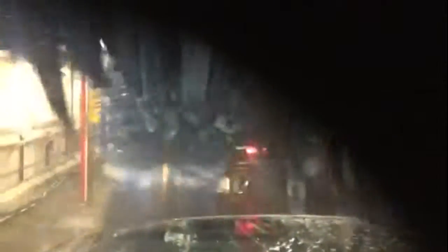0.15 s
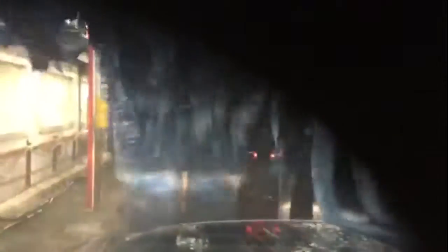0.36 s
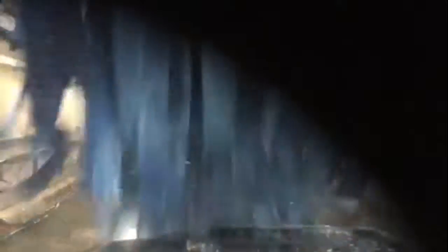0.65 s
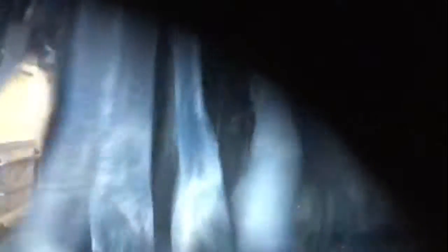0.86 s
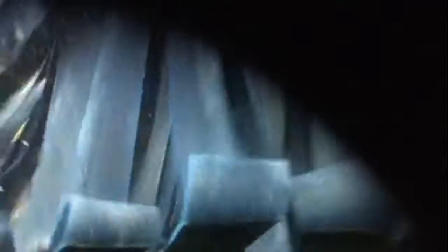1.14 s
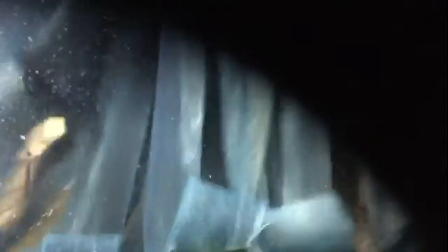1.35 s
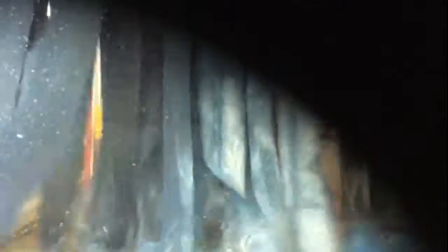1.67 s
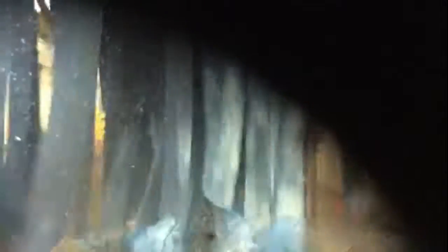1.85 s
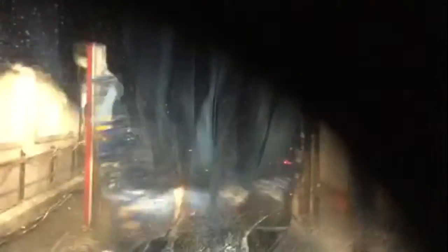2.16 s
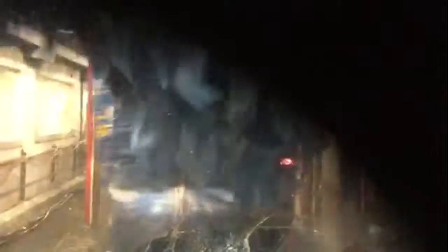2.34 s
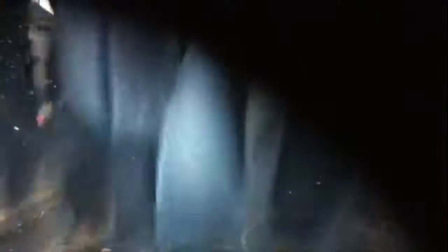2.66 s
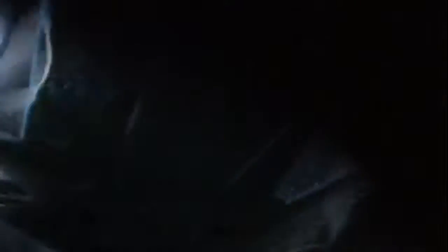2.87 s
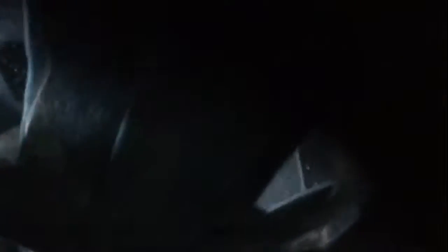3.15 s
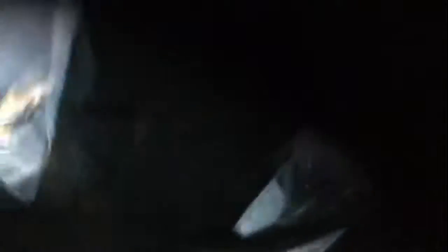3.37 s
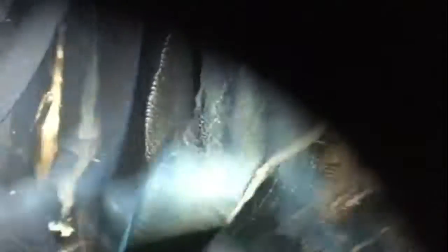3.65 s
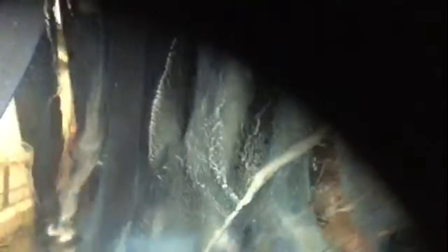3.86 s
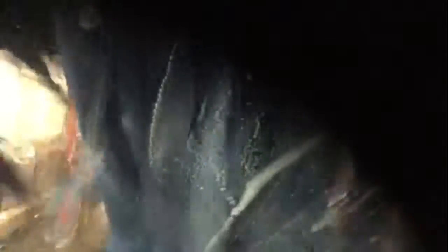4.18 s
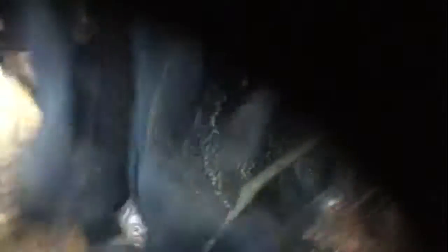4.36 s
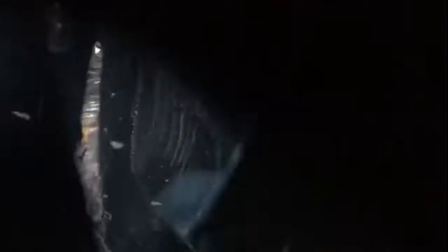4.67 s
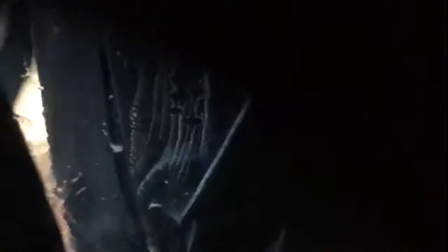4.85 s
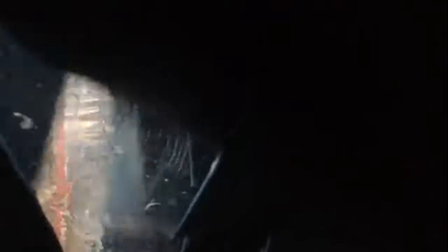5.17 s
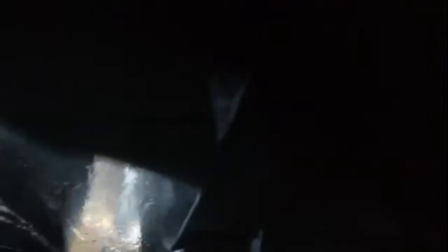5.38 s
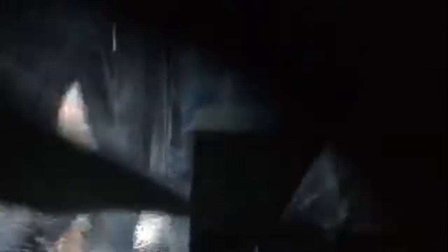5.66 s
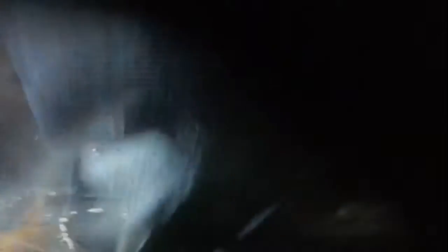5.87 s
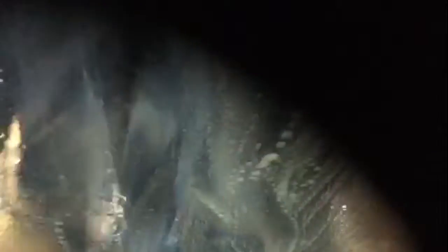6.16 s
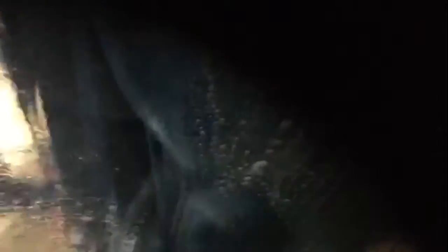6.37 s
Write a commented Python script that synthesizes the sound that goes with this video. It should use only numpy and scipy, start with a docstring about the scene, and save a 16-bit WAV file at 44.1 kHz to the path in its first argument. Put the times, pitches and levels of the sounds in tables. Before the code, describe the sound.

Heard from inside a closed car in an automatic wash: dense wet cloth drumming booms through the panels over a steady low motor drone and faint water hiss. Rapid soft slaps brush the glass with tiny squeaks, then harder whip-like cracks and heavy thuds arrive in bursts near the middle and later. One phone-like microphone in the cabin; dull, bass-heavy and close.

```python
"""Wet cloth drumming on the body panels over the drone of machinery, inside a car in an automatic wash.
Water sprays on the glass, and cloth slaps, squeaks, pops and cracks against it; heavy thuds ring the panels.
Noise shaped by tone colour makes the drone, spray, scrubbing and slaps; ringing resonances make the
drumming, thuds, squeaks, pops and cracks. The closed cabin makes it all dull and boomy.
"""
import sys
import numpy as np
from scipy import signal
from scipy.fft import rfft, irfft
from scipy.io import wavfile
from scipy.ndimage import uniform_filter1d

SR = 44100
rng = np.random.default_rng(int(sys.argv[2]) if len(sys.argv) > 2 else 0)


def generate_wav(signal):
    """Clip the signal to [-1, 1] and save it as 16-bit WAV at the path in sys.argv[1]."""
    frames = np.transpose(np.atleast_2d(signal))
    scaled = np.clip(frames, -1, 1) * 32767
    pcm = np.round(scaled).astype(np.int16)
    wavfile.write(sys.argv[1], SR, pcm)


N = 287532

# how hard the wash works over time; spray gets 3 dB more in spray():
# time_s, panel_drumming_db, cabin_boom_db, roar_db, spray_db, spray_treble_lift_db
WASH_STRENGTH = [(0.0, -29.5, -21.5, -36, -51.5, 4), (0.35, -26.5, -27.5, -40.5, -52, 1),
                 (0.7, -25.5, -22.5, -45, -54, 2.5), (1.05, -28, -30, -41.5, -53, 3.5),
                 (1.45, -24.5, -28.5, -39.5, -55.5, 2), (1.7, -25.5, -27, -40.5, -50.5, -9),
                 (1.9, -25, -31, -42.5, -57.5, 1), (2.05, -25.5, -30, -38.5, -58.5, 2),
                 (2.2, -25.5, -34, -37, -54.5, 9), (2.35, -30, -34.5, -34, -58, 5),
                 (2.45, -30.5, -26.5, -41.5, -55, -1), (2.6, -30.5, -26.5, -43, -53, -1.5),
                 (2.8, -26, -31.5, -42.5, -56, 1), (3.15, -32.5, -28.5, -42.5, -55, 0),
                 (3.4, -27, -25.5, -42, -54, -4), (3.55, -32.5, -31.5, -44, -55.5, -7.5),
                 (3.85, -30, -29.5, -40.5, -57.5, 6.5), (4.15, -28, -37.5, -42, -56.5, 0.5),
                 (4.4, -31.5, -29, -41, -56.5, 4.5), (4.68, -24.5, -31.5, -40.5, -56, 6),
                 (4.9, -29, -32.5, -49, -54, -4), (5.1, -29, -27.5, -39.5, -53.5, 1),
                 (5.3, -30.5, -28.5, -41.5, -50, 3.5), (5.6, -30.5, -34, -38, -51.5, -5),
                 (5.85, -28.5, -35, -42, -50.5, -2), (6.15, -29.5, -32, -42, -52, 0),
                 (6.52, -28.5, -34, -43, -56, 2)]
# where the cloth lands: time_s, small_stiff_panels_over_large_ones_db
PANEL_BALANCE = [(0, 0.5), (.8, -3.5), (1.3, 3.5), (1.9, -1), (2.1, 3.5), (2.35, 8), (2.55, -1),
                 (3.4, -1.5), (4.1, -2.5), (4.6, -1.5), (5.1, 1.5), (5.7, 1.5), (6.1, -2), (6.52, -4)]
# resonances of the panels and cabin air: pitch_hz, relative_level_db, time_to_fall_60_db_s
PANEL_RINGS = [(52.7, -6, 0.18), (75, -2, 0.084), (101.7, -1, 0.15), (129, -2, 0.083), (162.6, -2.5, 0.15),
               (207, -2, 0.079), (253, -5, 0.08), (294.5, -6, 0.095), (352.5, -9, 0.081),
               (491.5, -16.5, 0.051), (630, -18, 0.047)]
# tone colour of the machinery: frequency_hz, relative_level_db
DRONE_COLOUR = [(150, -28.5), (250, -12.5), (298, 2), (375, -11.5), (398, -6.5), (525, -16.5), (563, -19.5),
                (620, -12.5), (665, -14.5), (770, -15), (983, -27.5), (1460, -31), (4000, -55), (5200, -76),
                (8800, -120)]
# pump tone: pitch_hz, average_level_db
PUMP_TONES = [(619, -61.5)]
# tone colour of water on the glass: frequency_hz, relative_level_db
SPRAY_COLOUR = [(710, -7), (1200, -0.5), (1310, -2.5), (1420, -5.5), (1720, -10.5), (2000, -12.5),
                (2400, -18), (2800, -20), (3200, -22.5), (4300, -27.5), (5000, -29), (5500, -32.5),
                (5990, -36.5), (13700, -47), (15000, -58.5)]
# tone colour of slaps heard through the glass: frequency_hz, relative_level_db
GLASS_COLOUR = [(290, -23), (500, -3), (835, -12.5), (1080, -11), (1400, -14), (1720, -18.5), (2050, -19),
                (2330, -16), (3140, -20.5), (3570, -21.5), (4300, -26.5), (5050, -26), (5800, -30.5),
                (7800, -39), (12500, -45), (15000, -53.5)]
# wet slaps on the glass; slaps() lowers every level by 11.5 dB:
# hit_s, level_db, treble_tilt_db_per_octave
GLASS_SLAPS = [(0.0233, -39, -3), (0.0852, -38.5, -1.5), (0.1555, -41, -1), (0.2174, -38.5, -2),
               (0.2997, -37, -1.5), (0.315, -42, -3), (0.3346, -40.5, -5), (0.3541, -37, 0.5),
               (0.4424, -39.5, -4), (0.5707, -49.5, 0), (0.6205, -53, 1), (0.6424, -38.5, -2),
               (0.6883, -43, -3), (0.7811, -39, -3), (0.839, -40, -1), (0.9219, -41.5, -2.5),
               (0.9687, -40.5, -2.5), (1.024, -36, -3.5), (1.0731, -48, -2), (1.1334, -42, -5),
               (1.1707, -45, -6), (1.3254, -39, -2.5), (1.4187, -38, -4.5), (1.4492, -39, 0),
               (1.465, -38, -2.5), (1.5334, -39.5, -3.5), (1.5953, -40, -3.5), (1.6202, -42.5, -1),
               (1.6796, -39, -1.5), (1.755, -40.5, -3), (1.8094, -44.5, 1.5), (1.84, -38.5, -3),
               (1.8871, -43, 0), (1.9031, -31.5, -1), (1.9734, -41.5, -2), (2.0014, -36, -1.5),
               (2.0328, -41, -2), (2.0502, -39.5, -1.5), (2.1186, -38, -2), (2.168, -36.5, -2.5),
               (2.2494, -48, 1), (2.2887, -38, 1.5), (2.3256, -33, 0), (2.3965, -46, -2),
               (2.4189, -36.5, -1), (2.4788, -47, 1), (2.7128, -51, 3.5), (2.804, -30.5, -1),
               (2.8579, -43.5, 0), (2.8814, -48, 0), (2.899, -40.5, -3), (3.045, -48, -1.5),
               (3.2191, -45, -6.5), (3.25, -46, -1.5), (3.3418, -45.5, -0.5), (3.4, -38.5, 0),
               (3.447, -38.5, 2.5), (3.457, -38.5, 0), (3.486, -50, -2), (3.858, -43.5, -3.5),
               (4.1899, -48, -4), (4.5486, -42.5, -4), (4.617, -34, -2.5), (4.652, -36, 0.5),
               (4.695, -40, -0.5), (4.738, -36, -1), (4.7674, -44, -2), (4.785, -36, -0.5),
               (5.1592, -34, -1.5), (5.185, -44, 2), (5.204, -43, 2), (5.221, -44, 1), (5.24, -44, 1),
               (5.277, -34.5, 0.5), (5.298, -53, 3), (5.3253, -35.5, 2.5), (5.3916, -41.5, -1),
               (5.445, -43.5, -1.5), (5.505, -50, 2), (5.62, -46.5, -1), (5.65, -41, -4), (5.69, -56, 5),
               (5.76, -46.5, 2), (5.81, -42, -5), (5.84, -60, 7), (5.8887, -44, 3), (5.912, -34.5, 0.5),
               (5.9705, -42, 0), (6.0516, -40.5, -0.5), (6.1105, -43, 0.5), (6.225, -48, -4),
               (6.2682, -42, -1.5), (6.336, -37, -2)]
# squeaks of wet cloth dragging on the glass; level is lowered by 5 dB in squeaks_and_pops():
# loudest_s, pitch_hz, level_db, half_of_full_length_s
CLOTH_SQUEAKS = [(0.028, 2900, -56, 0.029), (0.197, 2830, -56, 0.06), (0.414, 2750, -61, 0.033),
                 (0.569, 2730, -55, 0.034), (0.697, 2830, -52.5, .04), (2.184, 2390, -48.5, 0.053),
                 (2.29, 2410, -49, 0.039), (2.485, 2590, -54, 0.038), (5.425, 4180, -66, 0.067),
                 (5.48, 2780, -66, 0.06), (5.777, 4180, -64, 0.064)]
# strip ends popping on the glass, lowered by the same 5 dB:
# loudest_s, pitch_hz, level_db, half_of_full_length_s
STRIP_POPS = [(1.032, 2570, -43.5, 0.0071), (2.124, 2670, -45, 0.0071), (2.281, 593, -30, 0.0073),
              (2.776, 5000, -59, .005), (2.807, 2500, -38, .005), (2.811, 1030, -41, 0.006),
              (2.824, 5080, -55, 0.0065), (3.397, 5200, -51, 0.0042), (3.457, 5280, -44.5, 0.0069),
              (3.459, 1380, -29, 0.0073), (3.468, 606, -34.5, 0.0082), (3.486, 4500, -54, 0.0033),
              (4.62, 4870, -46.5, 0.0073), (4.784, 3280, -39.5, 0.012), (5.157, 5240, -49, 0.0059),
              (5.27, 960, -38, 0.0057), (5.27, 4970, -37.5, 0.004), (5.795, 13000, -67, .004)]
# heavy blows of cloth on the panels: start_s, peak_db, strongest_panel_pitch_hz
HEAVY_BLOWS = [(0.05, -15.5, 73.5), (0.073, -16, 88), (0.202, -15, 105), (0.324, -8, 94),
               (0.525, -11.5, 86), (0.56, -15.5, 125), (0.62, -16, 131), (0.799, -9, 153),
               (0.835, -8.5, 155), (0.883, -12, 98), (0.967, -19, 113), (1.008, -12, 100), (1.021, -19, 86),
               (1.078, -19, 150), (1.175, -20, 105), (1.406, -17, 99), (1.44, -7, 108), (1.624, -12.5, 118),
               (2.038, -13.5, 96), (1.7, -17.5, 265), (1.762, -13.5, 217), (1.915, -28, 370),
               (2.194, -24, 235), (2.632, -10, 79), (2.665, -16, 107), (2.722, -17.5, 94),
               (2.8, -12.5, 300), (2.836, -16, 240), (2.801, -6, 144), (2.834, -11, 105),
               (3.138, -14.5, 84), (3.365, -14, 81.5), (3.414, -13.5, 107), (3.453, -13, 79.5),
               (3.466, -8, 100), (3.64, -14, 75.5), (4.138, -15, 103), (4.549, -9.5, 253),
               (4.573, -15, 188), (4.611, -19.5, 485), (4.615, -12.5, 242), (4.643, -7, 253),
               (4.698, -13, 228), (4.715, -13.5, 300), (4.731, -6, 270), (4.734, -28, 480),
               (4.737, -7.5, 121), (4.623, -15, 250), (4.773, -13, 260), (4.751, -24, 131),
               (4.858, -14, 123), (5.114, -23, 89.5), (5.163, -19, 300), (5.229, -16, 201),
               (5.267, -19, 250), (5.289, -18, 95), (5.563, -16.5, 79.5), (5.798, -16.5, 93),
               (6.115, -19, 152)]
# sharp, toneless cracks: start_s, centre_hz, peak_db, width_as_share_of_centre
STRIP_CRACKS = [(1.029, 1200, -25, .9), (1.03, 4500, -41, 1.2), (1.903, 3000, -38, 1.5),
                (2.272, 800, -30, .8), (2.795, 1300, -24, .8), (2.803, 2200, -23, 1.6),
                (2.808, 2500, -29, 1.5), (2.822, 3500, -38, 1.5), (2.86, 1210, -26, 1.1),
                (2.882, 1500, -28, 0.7), (2.898, 3500, -32, 0.95), (2.903, 1200, -32, .9),
                (3.123, 1820, -28, .8), (3.397, 4530, -32, 1.4), (3.403, 3500, -30, 1.5),
                (3.445, 3700, -33, .5), (4.55, 1500, -24, 1.3), (4.556, 2000, -32, 1.5),
                (4.611, 1300, -18.5, 1.4), (4.619, 4500, -36, 0.95), (4.643, 1100, -23, 1.4),
                (4.653, 4000, -36, 0.89), (4.732, 3500, -33, 1.1), (4.735, 1000, -20.5, 1.1),
                (4.783, 3500, -30, .9), (5.16, 1610, -22.5, .8), (5.161, 5500, -34, 1.3),
                (5.269, 2200, -23, 1.7), (5.27, 5000, -34, .7), (5.759, 1500, -35, 1.1),
                (6.049, 1500, -29, 1)]

# spots at or above STIFF_HZ are small and stiff; cloth lying on a panel leaves this share of its ring time
STIFF_HZ, LARGE_RING_SHARE, STIFF_RING_SHARE = 185.0, 0.77, 0.41
WHIRR_DB, WHIRR_WANDER_DB, WANDER_PER_S = -51, 1.5, 4.6
BRIGHT_HZ = 3600  # the spray's treble starts here
# cloth scrubbing along the wet bonnet until the strips lift off it
SCRUB_DB, SCRUB_HZ, SCRUB_WIDTH_HZ, LIFTS_S, LIFT_FADE_S = -60.5, 2570, 1200, 2.7, 0.1
SLAP_FADE_S = 0.1  # time to fall 60 dB at slap level -37.5 dB
HARD_SHORTEN = 0.19  # dB of fade time lost per dB of extra slap level
KNOCK_DB, KNOCK_SCATTER_DB = 0.5, 1  # low knock in each slap
SPATTER_DB, SPATTER_S = 2.5, .003  # unevenness of the water spurts and time between their levels
# light slaps: level over the spray column (before the slap trim), its scatter, tilt per octave
LIGHT_OVER_DB, LIGHT_SCATTER_DB, LIGHT_TILT_DB = 5.5, 0.5, -4
SQUEAK_WIDTH_HZ, POP_WIDTH_SHARE = 190, 0.11  # a pop's width is a share of its pitch
CRACK_S, CRACK_GRIT = 0.0018, 1.1  # how fast the grit dies away, and its strength
TOP_HZ = 15100


def undb(db):
    """Turn decibels into a gain."""
    return 10 ** (np.asarray(db) / 20)


def unit(x):
    """Scale to an average (rms) level of 1."""
    return x / np.sqrt(np.mean(x ** 2))


def bandpass_or_cut(x, order, hz, kind):
    """Keep one part of the frequency range with a smooth filter."""
    return signal.sosfilt(signal.butter(order, hz, kind, fs=SR, output="sos"), x)


def colour(x, points):
    """Shape the tone colour by (Hz, dB) points, joined on a log frequency scale."""
    hz = np.fft.rfftfreq(x.shape[-1], 1 / SR) + 1
    point_hz, point_db = np.transpose(points)
    db = np.interp(np.log(hz), np.log(point_hz), point_db)
    return irfft(rfft(x) * undb(db), x.shape[-1])


def walk(rate):
    """Wander at random: rate new levels per second, smoothed twice, with rms 1."""
    k = int(SR / rate)
    levels = np.repeat(rng.standard_normal(N // k + 1), k)
    smooth = uniform_filter1d(uniform_filter1d(levels, k), k)
    return unit(smooth[:N])


def ring(force, hz, t60):
    """Let a force set off one resonance that falls 60 dB in t60 seconds."""
    pole = np.exp(2j * np.pi * hz / SR - np.log(1000) / (t60 * SR))
    return signal.lfilter([1], [1, -pole], force).imag


def add(track, s, sound):
    """Mix a sound into the track at s seconds."""
    i = max(int(s * SR), 0)
    track[i:i + len(sound)] += sound[:len(track) - i]


def drumming(db, boom_db, per_s=260.0, scatter_db=1.5, air_top_hz=120, contact_s=.003, steady=0.087):
    """Many light strips land at random spots, so each panel rings with its own share of every blow."""
    blows = (rng.random(N) < per_s / SR) * undb(scatter_db * rng.standard_normal(N))
    k = max(int(contact_s * SR), 1)
    blows = np.sqrt(k) * uniform_filter1d(blows, k)  # soft cloth presses for a moment
    groups = np.zeros((3, N))  # cabin air, large panels, small panels
    for hz, mode_db, t60 in PANEL_RINGS:
        force = (blows + steady) * rng.standard_normal(N)
        group = int(hz > air_top_hz) + int(hz > STIFF_HZ)
        groups[group] += undb(mode_db) * ring(force, hz, t60)
    air, large, small = map(unit, groups)
    stiff_db = np.interp(np.arange(N) / SR, *np.transpose(PANEL_BALANCE))
    panels = undb(-3 - stiff_db / 2) * large + undb(-3 + stiff_db / 2) * small
    return undb(boom_db) * air + undb(db) * panels


def drone(roar_db, whirr_db, flicker_db=1.46, low_hz=409.0, split_hz=793.0):
    """Motors and gears send a low roar and a higher whirr through the body, with a faint pump tone."""
    t = np.arange(N) / SR
    tones = np.zeros(N)
    for hz, tone_db in PUMP_TONES:
        level = undb(tone_db + 0.92 * walk(3.0))
        phase = 2 * np.pi * hz * t + 1.9 * walk(8.1)  # slightly unsteady pitch
        tones += level * np.sqrt(2) * np.sin(phase)
    noise = colour(rng.standard_normal(N), DRONE_COLOUR)
    roar = unit(bandpass_or_cut(noise, 2, [low_hz, split_hz], "band"))
    whirr = unit(bandpass_or_cut(noise, 3, split_hz, "high"))
    roar = undb(roar_db + flicker_db * walk(14)) * roar
    whirr = undb(whirr_db + flicker_db * walk(23)) * whirr
    return roar + whirr + tones


def spray(db, drops_per_s=1800.0, scatter_db=0.5, flicker_db=1.0, patches=7):
    """Dense drops set off fine resonances in each patch of glass, and passing strips break the stream."""
    stream, flow, hz = 0, 0, np.fft.rfftfreq(N, 1 / SR)
    modes_db, shift_db = 4.0, 5.0  # unevenness of the resonances, and of the flow to each patch
    for _ in range(patches):
        drops = (rng.random(N) < drops_per_s / SR) * undb(scatter_db * rng.exponential(size=N))
        water = (drops + 0.64) * rng.standard_normal(N)
        uneven = np.interp(hz, np.linspace(0, 16000, 240), rng.standard_normal(240))
        patch = irfft(rfft(water) * undb(modes_db * uneven), N)
        share = undb(shift_db * walk(12))
        stream = stream + share * patch
        flow = flow + share ** 2
    # the water moves between patches while the whole flow stays the same
    hiss = unit(colour(stream / np.sqrt(flow), SPRAY_COLOUR))
    return undb(db + 3.0 + flicker_db * walk(9.2)) * hiss


def brighten(hiss, lift_db):
    """Split off the treble of a hiss and make it stronger or weaker."""
    treble = bandpass_or_cut(hiss, 2, BRIGHT_HZ, "high")
    bass = bandpass_or_cut(hiss, 2, BRIGHT_HZ, "low")
    return bass - treble * undb(lift_db)  # minus, as the two filters oppose each other where they meet


def scrub(flicker_db=0.5):
    """Cloth rubbing on the wet bonnet gives a broad, flickering hiss that fades as the strips lift off."""
    edges = [SCRUB_HZ - SCRUB_WIDTH_HZ / 2, SCRUB_HZ + SCRUB_WIDTH_HZ / 2]
    hiss = unit(bandpass_or_cut(rng.standard_normal(N), 2, edges, "band"))
    fade = 1 / (1 + np.exp((np.arange(N) / SR - LIFTS_S) / LIFT_FADE_S))
    return undb(SCRUB_DB + flicker_db * walk(21)) * fade * hiss


def slaps(rows, uneven_db=4.0, trim_db=-11.5, tail_db=-15.0, tail_s=0.3, soft_rise_s=.028, sharpen=1.3,
          knock_hz=1090.0):
    """Each slap squeezes out a burst of unevenly coloured water noise; the cabin lets it trail off."""
    out, size = np.zeros(N), 8192
    t, hz = np.arange(size) / SR, np.fft.rfftfreq(size, 1 / SR) + 1
    bursts = colour(rng.standard_normal((len(rows), size)), GLASS_COLOUR)
    ripples = np.clip(rng.standard_normal((len(rows), 120)), -1.5, 1.5)
    steps = np.arange(0, size / SR + SPATTER_S, SPATTER_S)
    spatters = np.clip(rng.standard_normal((len(rows), 128)), -2, 2)
    for (s, level_db, treble_db), burst, ripple, spatter in zip(rows, bursts, ripples, spatters):
        knock_db = KNOCK_DB + KNOCK_SCATTER_DB * ripple[0]
        tint = treble_db * np.log2(np.maximum(hz / 3000, .5))
        tint += knock_db / (1 + (hz / knock_hz) ** 4)
        tint += uneven_db * np.interp(hz, np.linspace(0, 16000, len(ripple)), ripple)
        spectrum = rfft(burst) * undb(tint)
        bright = irfft(spectrum * (hz > 1800))
        wet = irfft(spectrum) / np.std(bright)  # the bright part sets the level
        spurts = np.interp(t, steps, spatter[:len(steps)])
        wet = wet * undb(SPATTER_DB * spurts)  # the water leaves in spurts
        # hard slaps crack, soft ones swish
        rise_s = soft_rise_s * min(undb(-sharpen * (level_db + 38.5)), 1)
        rise = np.sin(np.pi / 2 * np.minimum(t / rise_s, 1)) ** 2
        t60 = SLAP_FADE_S * undb(-HARD_SHORTEN * (level_db + 37.5))
        after = np.maximum(t - rise_s, 0)
        fade = 1000 ** (-after / t60)
        tail = undb(tail_db) * 1000 ** (-after / tail_s)
        shape = rise * (fade + tail)
        add(out, s - .75 * rise_s, undb(level_db + trim_db) * wet * shape / shape.max())
    return out


def light_slaps(spray_db, count=190):
    """List light slaps at random moments, stronger where the spray is stronger, as rows for slaps()."""
    when, size = rng.random(count), rng.standard_normal(count)
    db = spray_db[(when * N).astype(int)] + LIGHT_OVER_DB + LIGHT_SCATTER_DB * size
    return list(zip(when * N / SR, db, np.full(count, LIGHT_TILT_DB)))


def squeaks_and_pops():
    """Wet cloth sticks and slips unevenly, setting off one resonance; pops are shorter and mostly broader."""
    rows = [(s, hz, SQUEAK_WIDTH_HZ, db, length) for s, hz, db, length in CLOTH_SQUEAKS]
    rows += [(s, hz, POP_WIDTH_SHARE * hz, db, length) for s, hz, db, length in STRIP_POPS]
    out = np.zeros(N)
    for (s, hz, width, level_db, length), slip in zip(rows, rng.standard_normal((len(rows), 16384))):
        k = min(int(2 * length * SR), 14000)
        t60 = np.log(1000) / (1.5 * np.pi * width)
        # ringing twice leaves less sound away from the pitch
        tone = ring(ring(slip, hz, t60), hz, t60)[-k:]
        tone = tone * np.sin(np.pi * np.sqrt(np.arange(k) / k)) ** 2  # quick rise, slower fall
        add(out, s - 0.51 * length, undb(level_db - 5.0) * unit(tone))
    return out


def thuds(spread_oct=0.2, push_s=0.0021):
    """A soft push rings most strongly the panels whose pitch is near that of the struck spot."""
    out, t = np.zeros(N), np.arange(SR // 2) / SR
    hz, db, t60 = (c[:, None] for c in np.transpose(PANEL_RINGS))
    push = np.hanning(int(push_s * SR) + 3)
    scatter = rng.standard_normal((len(HEAVY_BLOWS), len(PANEL_RINGS)))
    for (s, peak_db, spot_hz), side in zip(HEAVY_BLOWS, scatter):
        nearness = np.exp(-.5 * (np.log2(hz / spot_hz) / spread_oct) ** 2)
        share = undb(db + 2.0 * side[:, None]) * nearness
        ring_share = LARGE_RING_SHARE if spot_hz < STIFF_HZ else STIFF_RING_SHARE
        fade = 1000 ** (-t / (t60 * ring_share))
        sound = (share * np.sin(2 * np.pi * hz * t) * fade).sum(0)
        sound = np.convolve(sound, push)
        add(out, s, -undb(peak_db) * sound / np.abs(sound).max())
    return out


def cracks():
    """A strip end whips the pane: one jolt and a little grit set off a broad resonance."""
    out, t = np.zeros(N), np.arange(1024) / SR
    grits = rng.standard_normal((len(STRIP_CRACKS), len(t)))
    for (s, hz, peak_db, width), grit in zip(STRIP_CRACKS, grits):
        t60 = np.log(1000) / (1.5 * np.pi * width * hz)
        fading_grit = CRACK_GRIT * grit * np.exp(-t / CRACK_S) / np.sqrt(CRACK_S * SR)
        jolt = (t == 0) + fading_grit
        snap = ring(ring(jolt, hz, t60), hz, t60)
        add(out, s, undb(peak_db) * snap / np.abs(snap).max())
    return out


def scene():
    """Add up all the sounds that reach one microphone in the cabin."""
    s, *columns = np.transpose(WASH_STRENGTH)
    t = np.arange(N) / SR
    drum_db, boom_db, roar_db, spray_db, lift_db = (np.interp(t, s, c) for c in columns)
    whirr_db = WHIRR_DB + WHIRR_WANDER_DB * walk(WANDER_PER_S)
    machines = drone(roar_db, whirr_db)
    water = brighten(spray(spray_db), lift_db)
    cloth_on_body = drumming(drum_db, boom_db) + scrub() + thuds()
    cloth_on_glass = slaps(GLASS_SLAPS) + slaps(light_slaps(spray_db)) + squeaks_and_pops() + cracks()
    return (cloth_on_body + machines + water + cloth_on_glass)[None]


def record(dry):
    """The phone drops the deepest bass and cuts the top."""
    thin = bandpass_or_cut(dry, 4, 44.0, "high")
    return signal.sosfilt(signal.ellip(10, .2, 70, TOP_HZ, fs=SR, output="sos"), thin)


dry = scene()
out = record(dry)
generate_wav(out)
```